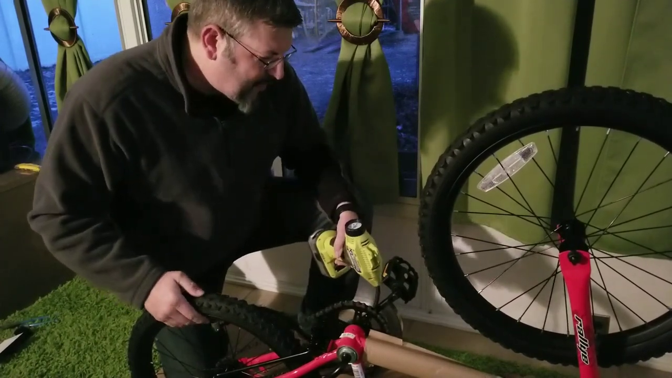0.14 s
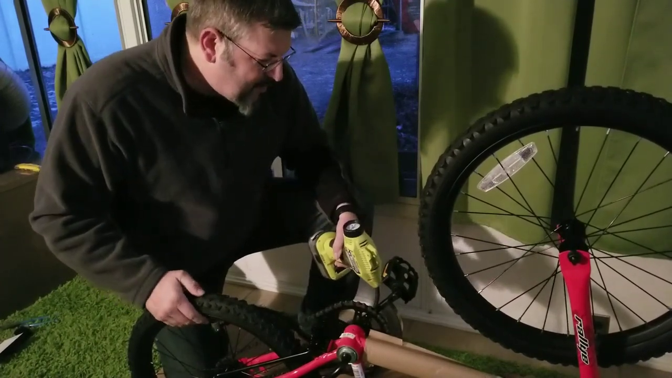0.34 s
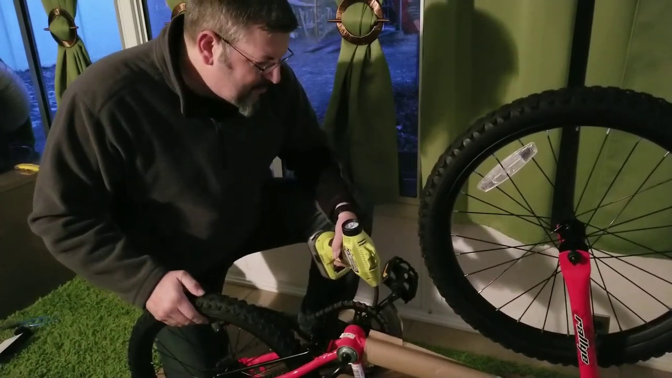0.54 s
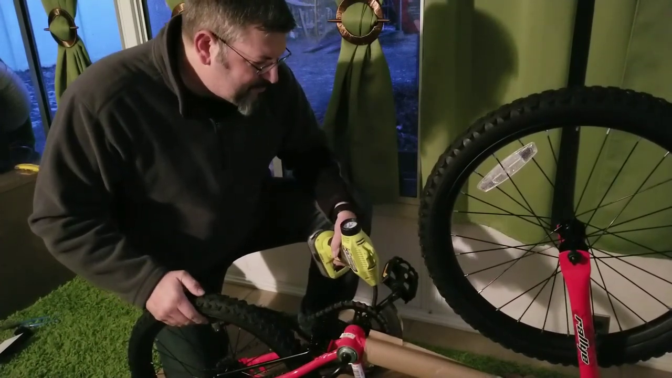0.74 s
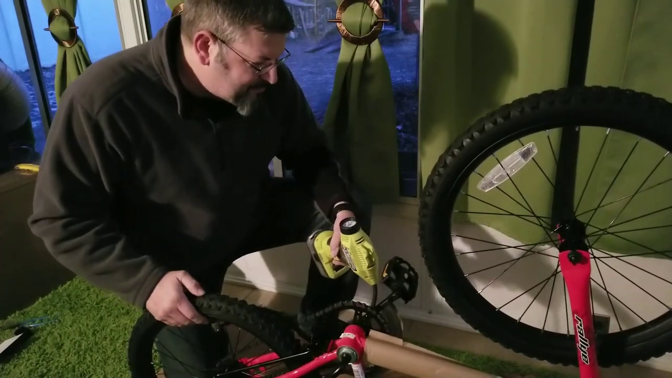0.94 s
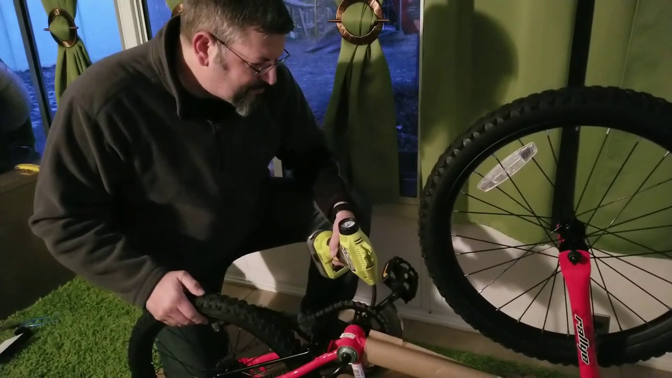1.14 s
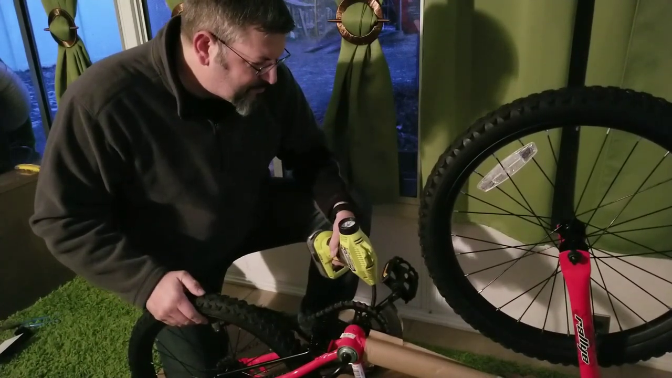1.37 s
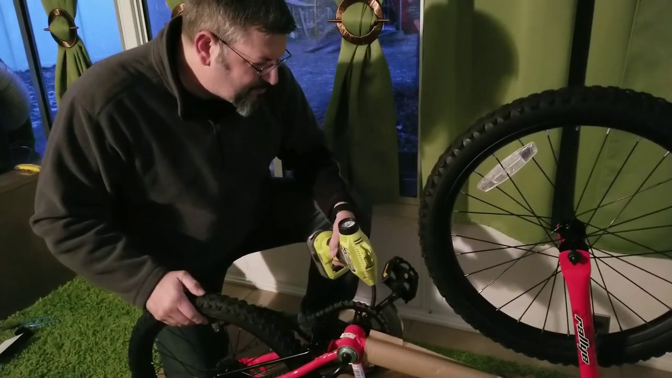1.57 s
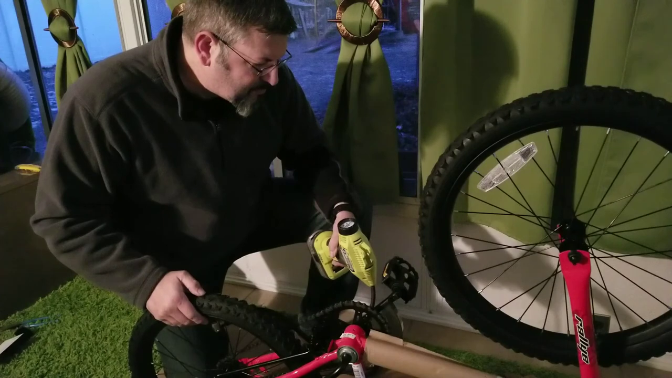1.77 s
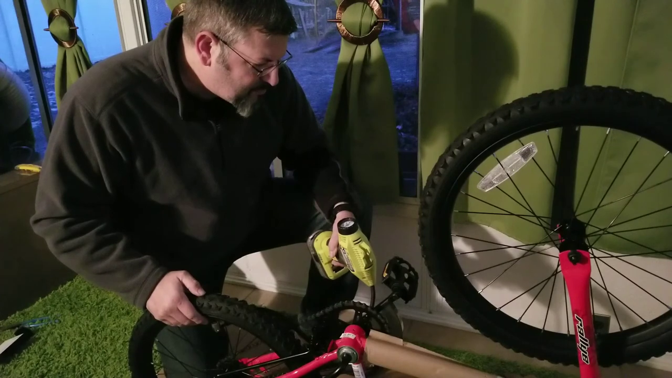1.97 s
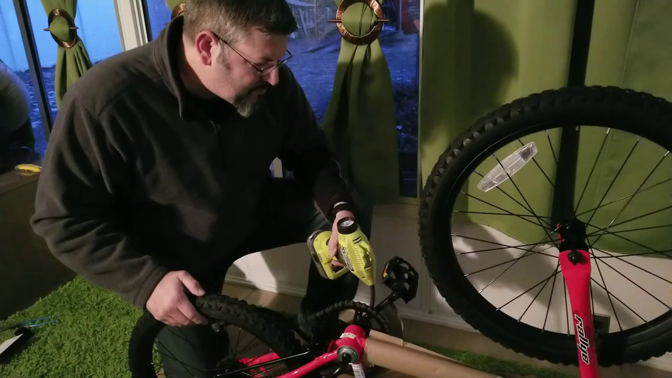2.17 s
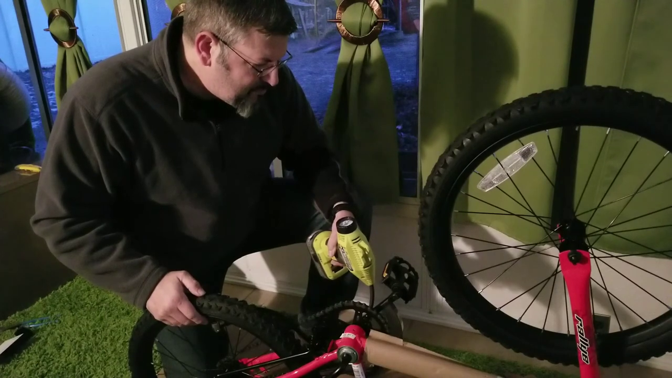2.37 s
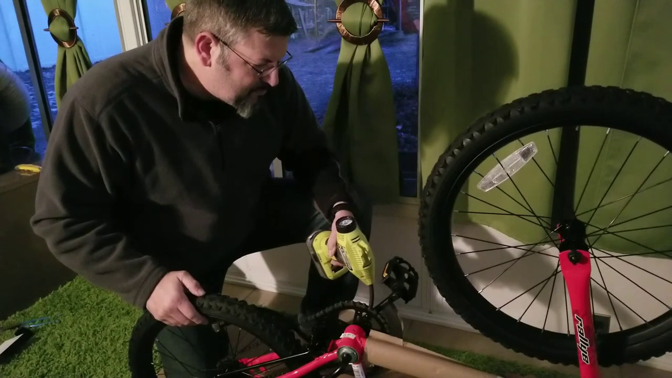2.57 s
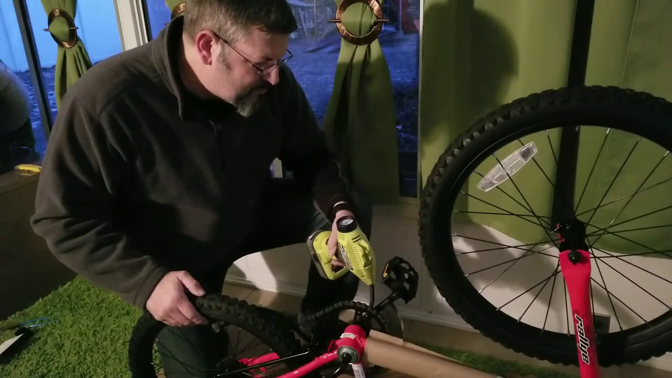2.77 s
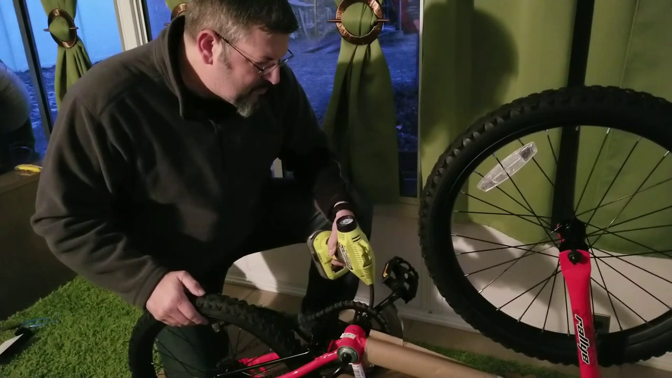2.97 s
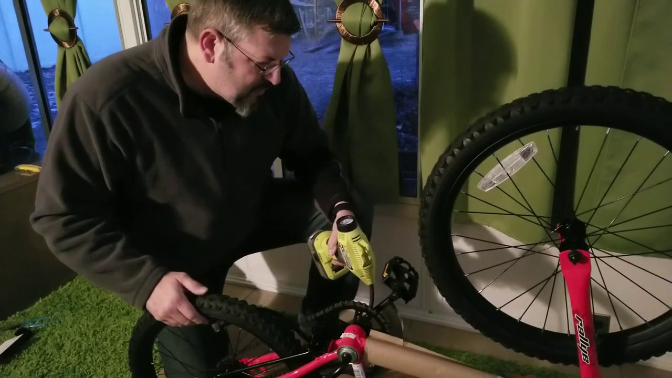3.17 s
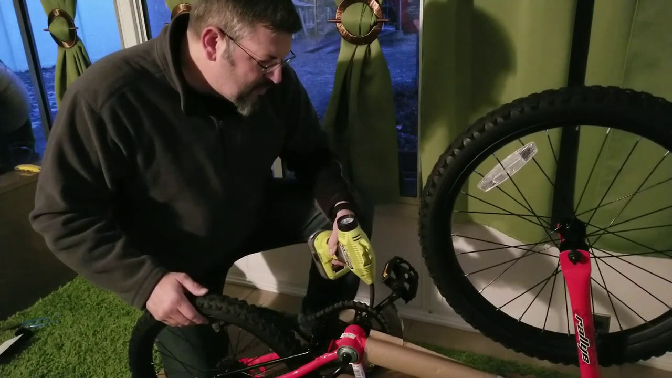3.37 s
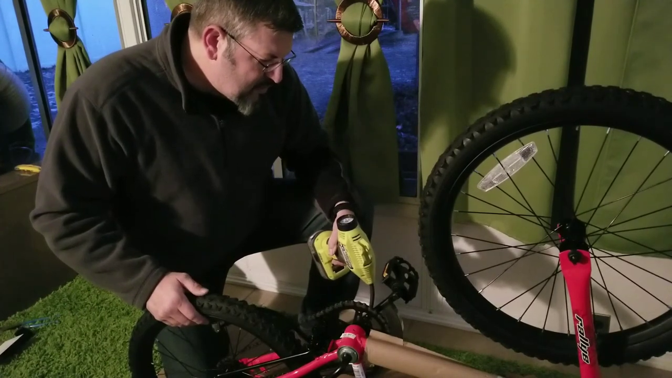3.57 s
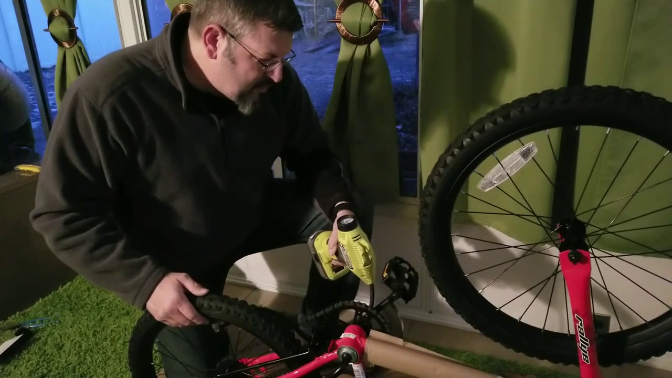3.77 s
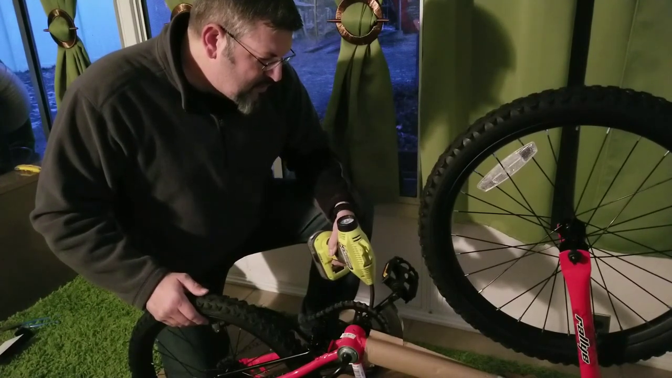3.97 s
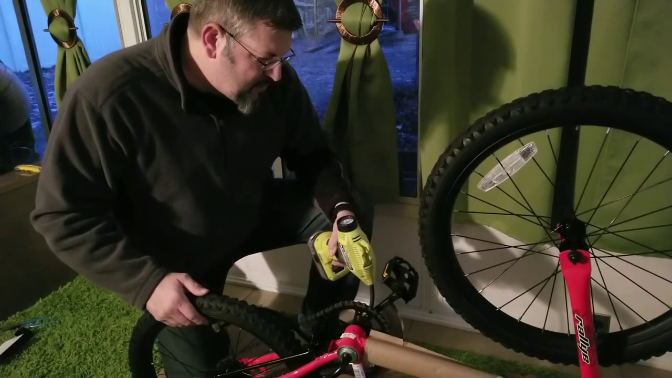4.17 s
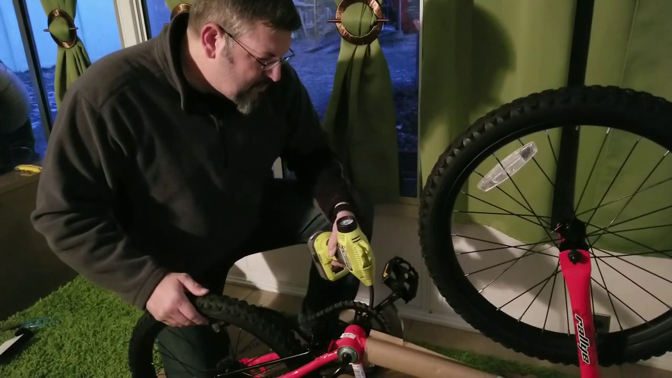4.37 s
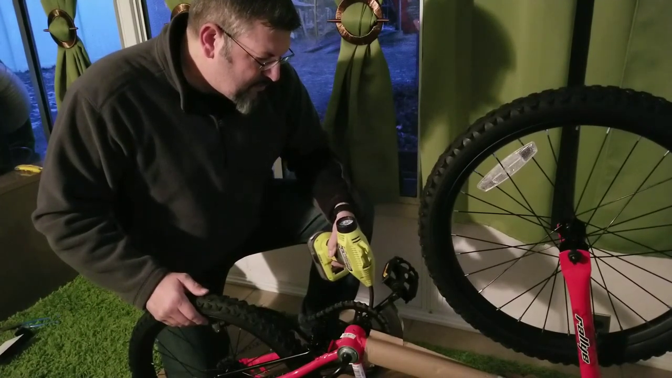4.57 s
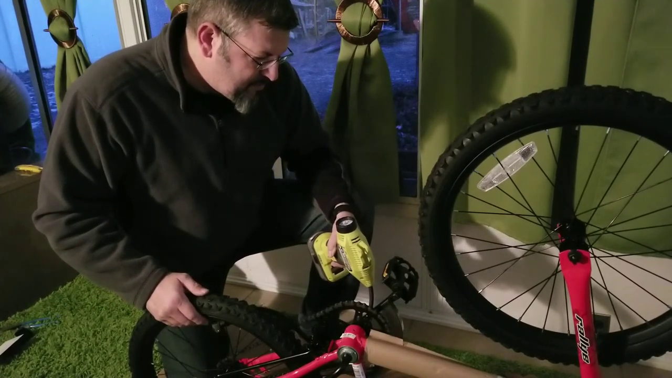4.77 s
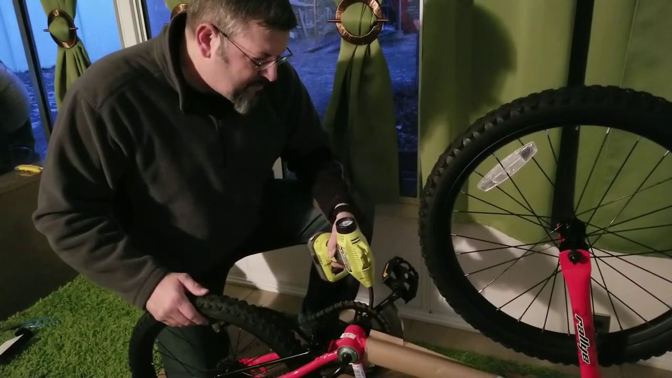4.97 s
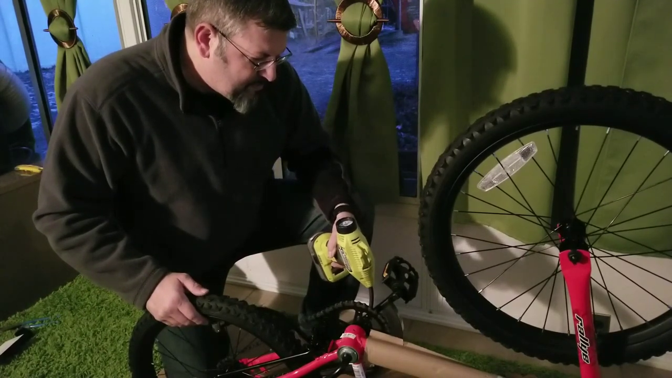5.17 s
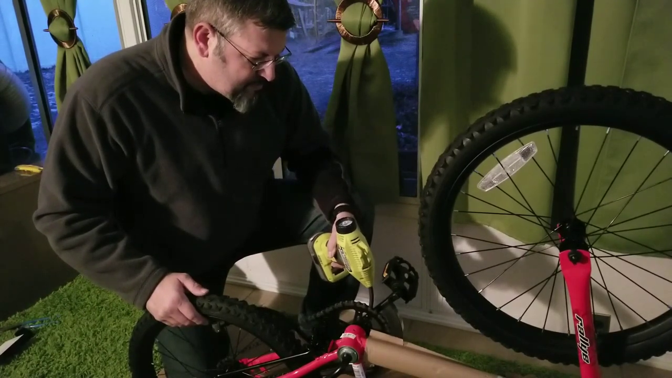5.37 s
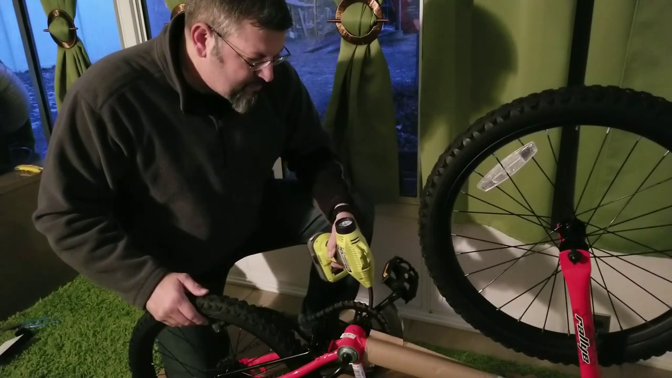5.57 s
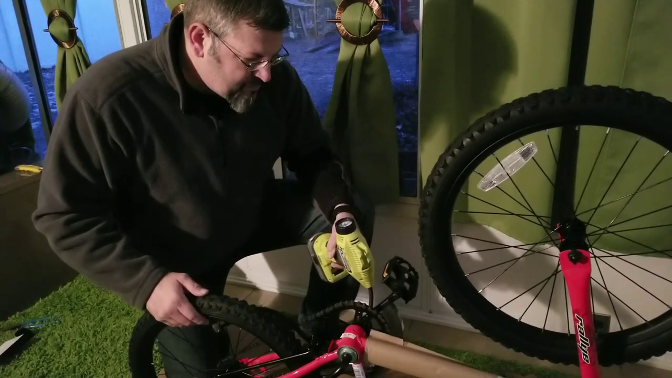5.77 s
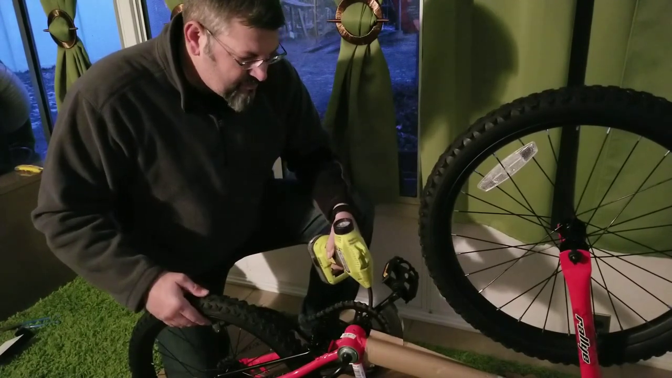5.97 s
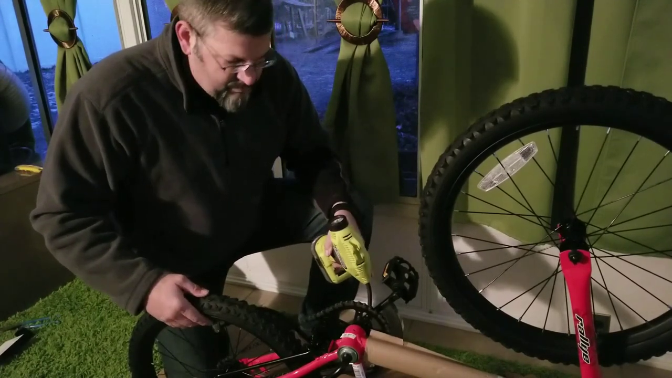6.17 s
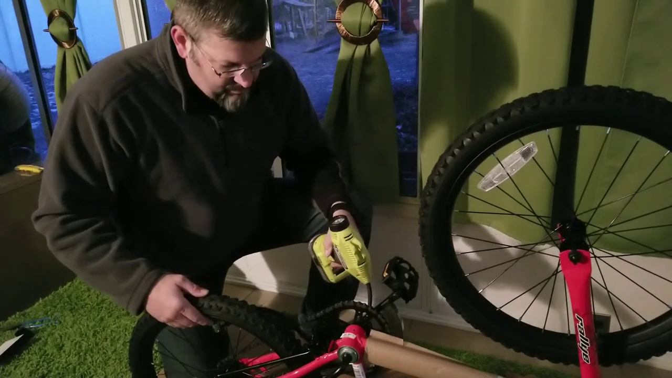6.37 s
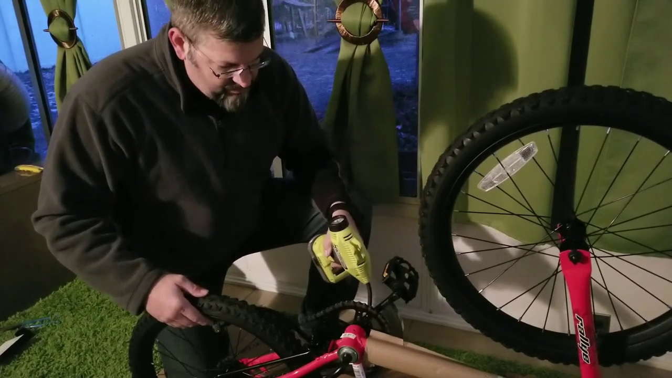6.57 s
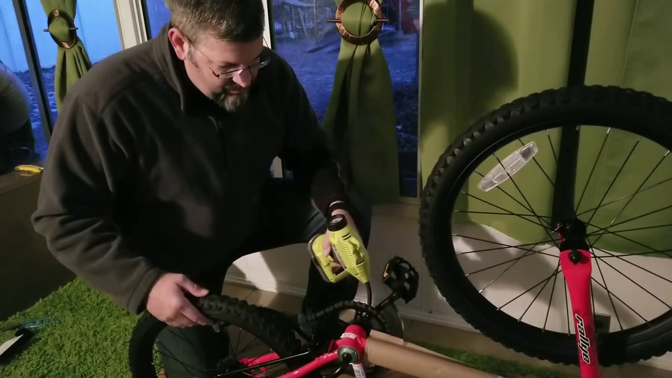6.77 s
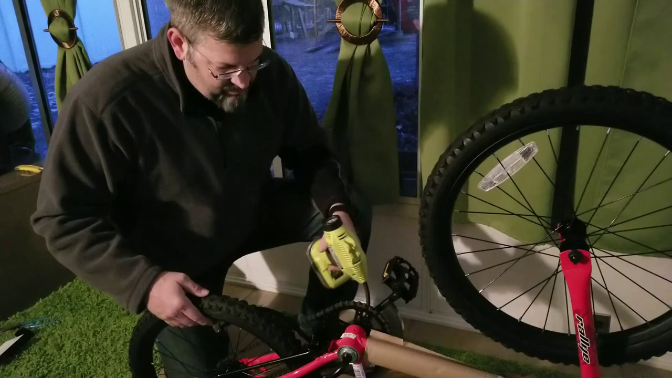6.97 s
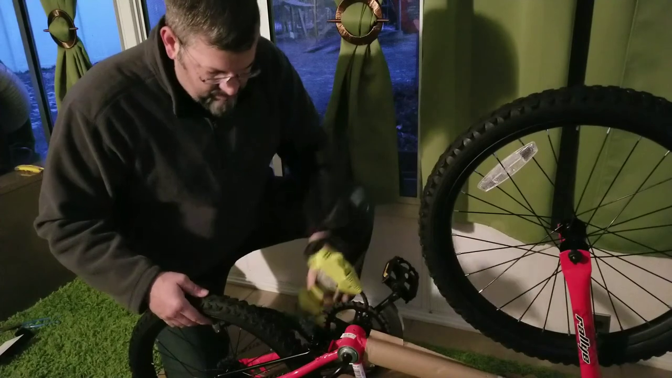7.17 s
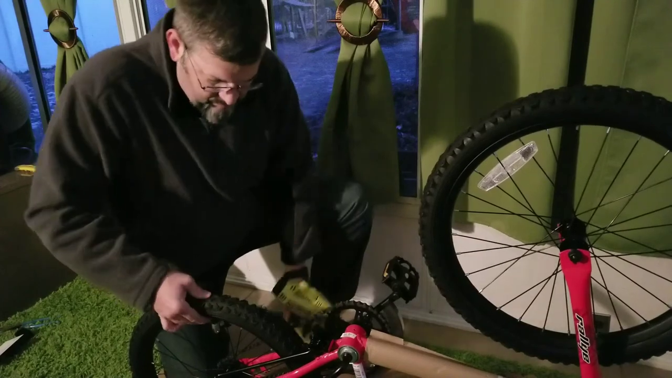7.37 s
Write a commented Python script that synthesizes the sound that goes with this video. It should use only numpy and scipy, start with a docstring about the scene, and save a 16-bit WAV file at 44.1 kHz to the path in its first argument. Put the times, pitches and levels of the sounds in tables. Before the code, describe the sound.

A handheld electric pump is already running at full strength, filling a bicycle tire: dense gear rattle, fast piston buzz, nasal whine and airy hiss. It slows very slightly, then after six seconds stops abruptly with short squeals, a dulling clatter and a tiny double tick. Quiet room tone and a few soft handling bumps follow. Close stereo microphone in a small, well-damped room.

```python
"""A small air pump is already rattling and whining as it fills a bicycle tire in a small, well-damped room.
A motor drives its piston through gears: teeth rattle, the rod knocks and chatters, the valves hiss and snap.
All these follow one crank angle; pitched lines from stroke and gears are added on top.
The crank slows a little as pressure builds, then the motor cuts off with short squeals and the crank coasts.
Quiet room tone and a few soft handling bumps remain."""
import sys
import numpy as np
from scipy import signal
from scipy.fft import rfft, irfft, next_fast_len
from scipy.io import wavfile

SR = 44100
rng = np.random.default_rng(int(sys.argv[2]) if len(sys.argv) > 2 else 0)


def generate_wav(sig):
    """Save sig (samples, or channels by samples) to the path in sys.argv[1] as 16-bit PCM at SR."""
    pcm = np.round(np.clip(np.atleast_2d(sig).T, -1, 1) * 32767).astype(np.int16)
    wavfile.write(sys.argv[1], SR, pcm)


N = 327341
TIME = np.arange(N) / SR   # seconds
SIZE = 2 * next_fast_len(N // 2 + SR // 4)   # transform length, with spare room for filter tails
HZ = np.maximum(np.arange(SIZE // 2 + 1) * SR / SIZE, 1)

# All levels are relative: later stages add the case, the room or the left-right balance.
# In every swell, length_s is the time from the peak to where the gain is down to about a seventh.

# loudness of the running pump: time_s, level_db
PUMP_LEVEL = [(0.06, -21), (1.38, -19.5), (1.46, -19.5), (3.67, -20), (3.92, -20.5), (5.02, -21.5),
              (6.14, -20.5)]
# force left in the rattle as the crank coasts: time_s, level_db
COASTING_LEVEL = [(6.19, 0), (6.24, 1), (6.272, -2.5), (6.305, -1), (6.328, -8), (6.345, -6), (6.362, -2),
                  (6.38, -12.5), (6.405, -19.5), (6.45, -32), (6.52, -70)]
# the pressure's time constant (s); crank speed with no pressure, and its loss at the pump's limit (turns per s)
FILL_S, FREE_TURNS_PER_S, SAG_TURNS_PER_S = 10.0, 62.22, 4.75
# the tone moves from soft to full tire between these pressures (share of the pump's limit)
SOFT_PRESSURE, FIRM_PRESSURE = 0.11, 0.28
# the motor cuts off, and the crank takes this long to stop (s)
CUT_S, COAST_S = 6.171, 0.27
# pace of the lines' fade and of the rumble's return after the cut-off (s)
LINES_FADE_S, RUMBLE_RETURN_S = 0.035, 0.15

# teeth on the two gears; lower edge of their rattle (Hz)
PINION_TEETH, WHEEL_TEETH, TEETH_LOW_HZ = 10, 66, 700
# piston knocks within each turn: position_turns, level_db
KNOCK_POINTS = [(0.2, -4), (0.452, 0), (0.529, -19.5), (0.731, 4.5)]
# knocks against the teeth, chatter against all contacts, trims of the rattle and of the pitched lines (dB)
KNOCK_DB, CHATTER_DB, RATTLE_DB, LINES_DB = -12.5, -10.5, 0.5, -0.12

# broad colour of the plastic case: pitch_hz, level_db
CASE_COLOUR = [(120, -46.5), (220, -39), (300, -1.5), (600, -7), (1300, -4), (2100, -6), (2600, -2.5),
               (3000, -2), (3900, 1.5), (5400, -2), (7000, 0.5), (7800, -5), (11000, 1), (14500, -2)]
# resonances and hollows of case and air path: pitch_hz, width_hz, soft_tire_db, full_tire_db
CASE_RESONANCES = [(397, 63, -10, 0.5), (718, 510, -1, -0.5), (945, 82, 1.5, 1), (1240, 120, 1, 3.5),
                   (1825, 390, 1.5, 2.5), (2011, 26, 6.5, 5.5), (2484, 120, 1.5, 5), (2730, 410, 2.5, 1),
                   (3510, 910, 0.5, 2.5), (4165, 190, 4.5, 0.5), (4660, 260, 2.5, 3.5), (4970, 130, 0.5, 2),
                   (5520, 180, 0, 1.5), (6014, 80, 3, 8), (7210, 340, 1.5, 2.5), (8410, 540, 5, 4.5),
                   (9760, 2500, -4, -4)]
# side sound against middle sound, as the two microphone ports hear it: pitch_hz, level_db
STEREO_WIDTH = [(200, -19.5), (380, -13.5), (700, -2), (1300, -1.5), (2400, -6), (4400, -4.5), (7000, 2.5),
                (9000, -0.5), (14000, -3)]
# power share of the side sound that comes by way of the walls: pitch_hz, share (0 to 1)
WALL_SHARE = [(700, .03), (2000, .25), (4000, .35), (8000, .6)]
# resonances that swell or sink as the hand shifts and parts settle: start_s, end_s, pitch_hz, width_hz, level_db
RESONANCE_SPELLS = [(-.3, 1.56, 410, 110, -10), (-.3, 0.26, 8900, 405, 6), (-.3, 0.56, 4200, 199, -0.5),
                    (-.3, 1.58, 5670, 130, 7), (.55, 1.15, 2850, 129.5, 1), (.65, 1.3, 2530, 98, 3.5),
                    (.8, 1.9, 8570, 128.2, 5.5), (.8, 2.6, 8820, 90, 4.5), (1.0, 2, 6300, 60.5, 1.5),
                    (1.3, 2.5, 4020, 200, 1), (1.7, 3.2, 910, 70.5, 1.5), (2.7, 4.4, 5740, 89.7, 3.5),
                    (3.1, 5.8, 3750, 70, 1.5), (3.8, 6.2, 9400, 703, -2), (4.1, 5.4, 1830, 604, -2.5),
                    (4.3, 7.9, 4940, 70, 4), (4.5, 6.2, 5580, 39.7, 8.5), (4.0, 5.6, 2380, 91.2, 0.5)]
SPELL_EDGE_S = 0.07   # each change is spread this far to either side of its time

# harmonics of the piston stroke: multiple_of_crank_speed, soft_tire_db, full_tire_db
STROKE_HARMONICS = [(5, -53, -45.5), (6, -55, -47), (7, -71, -60), (8, -46, -45), (9, -45, -51),
                    (10, -59, -63), (11, -46, -43), (12, -43, -51), (13, -44, -47.5), (14, -50, -50),
                    (15, -37, -44.5), (16, -47, -49), (17, -43, -53), (18, -54, -50), (19, -56, -55),
                    (20, -51, -39), (21, -52, -44.5), (22, -46, -46), (23, -56, -56), (24, -51, -44.5),
                    (25, -45, -49), (26, -53, -53)]
# gear lines that each swell once: multiple_of_crank_speed, peak_s, length_s, level_db
GEAR_LINES = [(40, 1.9, 2.2, -45), (41, 5.3, 6, -41.5), (42, 5.3, 2.5, -45), (43, 2.6, 1.8, -43),
              (44, .7, 4, -39.5), (45, 5.4, 1.5, -42.5), (46, .8, 1.3, -45), (47, .4, 1.1, -41.5),
              (48, 3.3, 1.8, -45.5), (55, .8, 1.2, -42.5), (56, 5.2, 1.8, -43.5), (59, 3.5, 1.6, -43),
              (61, 3.7, 1.2, -38), (63, 2, .9, -36), (64, 3.5, 6, -41), (65, 3, 3, -43.5),
              (67, 1.2, 5, -40), (68, .8, 1.6, -41.5), (69, .6, .9, -41.5), (76.8, 2, 1, -42.5),
              (82, 5.2, 1.2, -41.5), (82.4, 5, 1, -42.5), (85, 5.3, 1.3, -44.5), (91, .6, 1.5, -43.5),
              (92, 1.1, .9, -38.5), (94, 4.6, 1.8, -42.5), (99, 2.8, 1.2, -42.5), (99.8, 3.3, .9, -41),
              (136, 1.2, 1.3, -44.5)]
# brief patches where the bass edge comes through, at the third crank harmonic: peak_s, length_s, level_db
BASS_PATCHES = [(.05, 0.11, -52.5), (.15, 0.011, -46), (.325, 0.11, -56), (.555, 0.014, -46),
                (.7, 0.04, -58), (.855, 0.043, -48.5), (2.24, 0.016, -50)]
PATCH_PAN_DB = 14   # left against right
# bass edge at the fourth crank harmonic: level when fully on (dB), pace of its flicker (Hz)
FLICKER_DB, FLICKER_RATE = -52.5, 11
# how high chance must rise to let it through, early and later on (standard deviations)
FLICKER_BAR_EARLY, FLICKER_BAR_LATE = 0.1, 2.9

# colour of the room tone: pitch_hz, level_db
ROOM_TONE_COLOUR = [(30, -29), (130, -34.5), (210, -12.5), (335, 0), (450, -3.5), (650, -19.5), (2250, -25),
                    (2500, -17.5), (3100, -20.5), (4050, -22), (4600, -13.5), (7400, -13.5), (8000, -28),
                    (14500, -28)]
# colour of the low rumble: pitch_hz, level_db
RUMBLE_COLOUR = [(20, -6), (45, -10), (75, -10), (130, 0.5), (190, -16.5), (300, -35), (1000, -63)]
# soft handling bumps: peak_s, length_s, level_db
HANDLING_BUMPS = [(6.615, 0.088, -65.5), (6.98, 0.062, -65), (7.16, 0.068, -62)]
# colour of the bumps: pitch_hz, level_db
HANDLING_COLOUR = [(100, -29), (230, -16), (330, 9), (480, -12), (900, -33), (4000, -50)]
# steady background, and how much lower the rumble sits while the motor drives (dB)
ROOM_TONE_DB, RUMBLE_DB, RUMBLE_DIP_DB = -66.5, -77, 15
# the pump is swung away at the end: peak (s), length (s), rumble (dB), rustle (dB)
SWING_S, SWING_LENGTH_S, SWING_RUMBLE_DB, SWING_RUSTLE_DB = 7.36, 0.12, -77.5, -77.5

# squeals as the motor cuts off: peak_s, length_s, level_db
CUTOFF_SQUEALS = [(6.186, 0.0092, -27.5), (6.202, 0.009, -18), (6.228, 0.009, -26.5), (6.253, 0.014, -20.5)]
# colour of the squeals: pitch_hz, level_db
SQUEAL_TONE = [(200, -80), (2500, -49.5), (4100, -11), (4600, 6), (4900, -17.5), (5600, -16), (9000, -36.5)]
# the pump chamber rings as the crank coasts: peak (s), length (s), level (dB), pitch (Hz)
RING_S, RING_LENGTH_S, RING_DB, CHAMBER_HZ = 6.355, 0.02, -37.5, 1220
# double tick as the gears fall back into their play: time_s, level_db
GEAR_TICKS = [(6.412, -18.5), (6.418, -23.5)]
# colour of the ticks: pitch_hz, level_db
TICK_TONE = [(200, -10.5), (900, -2), (1500, 2), (1950, -4), (2500, 7.5), (3500, 0.5), (4200, -9),
             (10000, -13.5), (13000, -7.5)]
CUTOFF_HZ = 14600   # upper edge of the whole sound


def from_db(db):
    """Turn decibels into gain."""
    return np.exp(np.asarray(db) * (np.log(10) / 20))


def rms_one(x):
    """Scale a signal to unit power."""
    return x / np.sqrt(np.mean(x ** 2) + 1e-20)


def level_over_time(rows):
    """Join a table's levels with straight lines in time."""
    seconds, db = np.transpose(rows)
    return np.interp(TIME, seconds, db)


def spectrum(points):
    """Find the dB at every frequency, joining points on a log axis."""
    hz, db = np.transpose(points)
    return np.interp(np.log(HZ), np.log(hz), db)


def colour(x, db):
    """Filter to a dB curve with no sound ahead of its cause (minimum phase)."""
    cepstrum = irfft(np.log(from_db(db)))
    cepstrum[1:SIZE // 2] *= 2
    cepstrum[SIZE // 2 + 1:] = 0
    response = np.exp(rfft(cepstrum))
    return irfft(rfft(x, SIZE) * response)[..., :N]


def filtered(x, order, hz, kind):
    """Keep only the high part or a band of a sound."""
    return signal.sosfilt(signal.butter(order, hz, kind, fs=SR, output="sos"), x)


def resonance(x, hz, width):
    """Pick out the part of a sound that rings near one pitch."""
    return signal.lfilter(*signal.iirpeak(hz, hz / width, fs=SR), x)


def drift(rate):
    """Smooth random wandering with unit power; rate is in Hz."""
    r = np.exp(-200 * np.pi * rate / SR)   # one step every 100 samples
    noise = rng.standard_normal(N // 100 + 1002)
    slow = signal.lfilter([1], [1, -2 * r, r * r], noise)[1000:]
    return np.interp(np.arange(N) / 100, np.arange(len(slow)), rms_one(slow))


def clicks(seconds, sizes):
    """Place impacts one sample long."""
    at = np.round(np.asarray(seconds) * SR).astype(int)
    return np.bincount(np.clip(at, 0, N), sizes, N + 1)[:N]


def swells(rows):
    """Add bell-shaped envelopes from peak_s, length_s, level_db rows."""
    return sum(from_db(db) * np.exp(-2 * ((TIME - s) / length) ** 2) for s, length, db in rows)


def scatter(x, t60):
    """Spread a sound into dense echoes that fall 60 dB in t60 seconds."""
    t = TIME[:SR // 2]
    echoes = rng.standard_normal(len(t)) * from_db(-60 * t / t60)
    return signal.fftconvolve(x, echoes / np.linalg.norm(echoes))[:N]


def load(turns, opens_at, lasts):
    """Rise suddenly once a turn, then decay."""
    return np.exp(-((turns - opens_at) % 1) / lasts)


def fade(seconds):
    """Stay at 1 while the motor drives, then fall like half a bell."""
    return np.exp(-(np.maximum(TIME - CUT_S, 0) / seconds) ** 2)


def crank_speed(pressure, easing=1.4):
    """Back pressure slows the crank; after the cut-off friction brings it to rest (turns per s)."""
    coasting = 1 - np.clip((TIME - CUT_S) / COAST_S, 0, 1) ** easing
    return (FREE_TURNS_PER_S - SAG_TURNS_PER_S * pressure) * coasting


def gear_rattle(turns, tooth_db=3.6, chance_db=2.0, turn_db=.4, play=.3, slip=.015,
                wobble=.15, surge=.07, worn_share=.2, thrust=.1):
    """The same teeth meet every five turns, so uneven clatter repeats; worn teeth repeat every turn."""
    pairs = np.lcm(PINION_TEETH, WHEEL_TEETH)
    error, offset, flank = rng.standard_normal((3, pairs))
    tooth = np.arange(pairs * 80)
    strength, late, turn_strength = rng.standard_normal((3, len(tooth)))
    turn, on_wheel = np.divmod(tooth, WHEEL_TEETH)
    worn = rng.random(WHEEL_TEETH) < worn_share
    pair = np.where(worn[on_wheel], on_wheel, tooth % pairs)

    meets_at = (tooth + play * offset[pair] + slip * late) / WHEEL_TEETH
    when = np.interp(meets_at, turns, TIME, right=N)
    hit_db = tooth_db * np.clip(error[pair], -2, 2) + chance_db * strength + turn_db * turn_strength[turn]
    sizes = from_db(hit_db) * np.sign(flank[pair])
    # the pinion presses harder once a motor turn
    eccentric = 1 + wobble * np.cos(2 * np.pi * tooth / PINION_TEETH)
    cycle = 2 * np.pi * tooth / pairs
    # some stretches of the cycle mesh tighter
    tight = 1 + surge * (np.cos(cycle) + np.sin(2 * cycle))
    # the piston pushes back at the top of its stroke
    pushing = 1 + thrust * load(tooth / WHEEL_TEETH, opens_at=0.63, lasts=0.22)
    clatter = rms_one(clicks(when, sizes * eccentric * tight * pushing))
    return filtered(clatter, 2, TEETH_LOW_HZ, "high")


def piston_knocks(turns, chance_db=1.2, looseness=.004, dull_hz=3800, ring_t60=.008):
    """Rod and bearings take up their play at fixed points of each turn, each with its own short ring."""
    turn = np.arange(400)
    out = 0
    for part, db in KNOCK_POINTS:
        strength, late = rng.standard_normal((2, len(turn)))
        when = np.interp(turn + part + looseness * late, turns, TIME, right=N)
        hits = clicks(when, from_db(db + chance_db * strength))
        out = out + hits + 0.43 * scatter(hits, ring_t60)
    return rms_one(filtered(out, 3, [1750, dull_hz], "band"))


def valve_snaps(turns, chance_db=5.0, looseness=0.0065):
    """The outlet valve snaps open once a turn with a bright tick."""
    turn = np.arange(400)
    strength, late = rng.standard_normal((2, len(turn)))
    when = np.interp(turn + .49 + looseness * late, turns, TIME, right=N)
    ticks = clicks(when, from_db(chance_db * np.clip(strength, -2, 1)))
    return rms_one(filtered(ticks, 2, 3000, "high"))


def rod_chatter(turns, chance_db=1.8, looseness=.04, attack_s=.0007, decay_s=.0022):
    """The loose rod end makes short noise bursts at each reversal, harder at the top of the stroke."""
    stroke = np.arange(800)   # two reversals a turn
    strength, late = rng.standard_normal((2, len(stroke)))
    when = np.interp(stroke / 2 + 0.445 + looseness * late, turns, TIME, right=N)
    hit_db = chance_db * np.clip(strength, -3, 1) - 4 * (stroke % 2)
    hits = clicks(when, from_db(hit_db))
    poles = np.exp(-1 / (SR * np.array([attack_s, decay_s])))
    burst = signal.lfilter([1], np.poly(poles), hits + 1e-18)
    return rms_one(filtered(burst * rng.standard_normal(N), 2, [2700, 5600], "band"))


def valve_air(turns, puff=.7, intake=.58):
    """Air hiss spurts as the outlet valve opens, less as the inlet does, from vents on both sides."""
    outlet = puff * load(turns, opens_at=0.34, lasts=0.16)
    inlet = intake * load(turns, opens_at=0.76, lasts=0.092)
    vents = rng.standard_normal((2, N)) + 0.87 * rng.standard_normal(N)
    hiss_colour = spectrum([(300, 3.5), (1500, 7.0), (4000, 2), (7000, 7.0), (11000, 3.5)])
    return rms_one(colour(vents * (1 + outlet + inlet), hiss_colour))


def soften(force, speed, dull_hz=1800, steepness=1.3):
    """Contacts turn dull as the crank loses its speed."""
    bright = np.minimum(speed / np.interp(CUT_S, TIME, speed), 1) ** steepness
    dull = signal.lfilter(*signal.butter(1, dull_hz, fs=SR), force)
    return bright * force + (1 - bright) * dull


def case(force, firmness, flutter_db=.7, flutter_rate=22):
    """The case rings; its resonances change in level with back pressure and flutter as parts shake."""
    broad = spectrum(CASE_COLOUR)
    out = colour(force, broad) / np.sqrt(np.mean(from_db(broad) ** 2))
    for hz, width, soft_db, full_db in CASE_RESONANCES:
        ring = resonance(out, hz, width)
        gain = from_db(soft_db + firmness * (full_db - soft_db) + flutter_db * drift(flutter_rate))
        out = out + (gain - 1) * ring
    return from_db(-2.5) * out


def room(x, wet_db=-5, t60=0.048, wall_s=.004, port_ripple_hz=260, lead=0.88):
    """Two ports hear pitches out of step, treble partly off walls; curtains and carpet keep the tail short."""
    mid = x.mean(axis=0)
    chance = np.interp(HZ / port_ripple_hz, np.arange(400), rng.standard_normal(400))
    step = np.tanh(3 * (chance + lead * (HZ < 6000)))
    share = spectrum(WALL_SHARE)
    direct = 1j * step * rfft(mid, SIZE)   # a quarter cycle out of step
    diffuse = rfft(scatter(mid, .13), SIZE)
    blend = np.sqrt(1 - share) * direct + np.sqrt(share) * diffuse
    side = irfft(from_db(spectrum(STEREO_WIDTH)) * blend)[:N]
    late = np.interp(TIME - wall_s, TIME, mid, left=0)
    tail = np.array([scatter(late, t60), scatter(late, t60)])
    return x + side * np.array([[1], [-1]]) + from_db(wet_db) * tail


def spells(x):
    """Lift or lower each resonance while its spell lasts."""
    for start, end, hz, width, db in RESONANCE_SPELLS:
        corners = [start - SPELL_EDGE_S, start + SPELL_EDGE_S, end - SPELL_EDGE_S, end + SPELL_EDGE_S]
        on = np.interp(TIME, corners, [0, 1, 1, 0])
        x = x + (from_db(db) - 1) * on * resonance(x, hz, width)
    return x


def crank_line(order, turns, db, spread_hz, port_hz=2400):
    """A tone locked to the crank: low ones lag in the case, high ones reach the two sides out of step."""
    lag, across = rng.standard_normal(2)
    hz = order * FREE_TURNS_PER_S
    cycles = order * (turns - .45) % 1
    phase = (2 * np.pi * cycles + lag * (spread_hz / hz) ** 2).astype(np.float32)
    side = np.sign(across) * min(hz / port_hz, .8) * np.sin(phase)
    return np.sqrt(2) * from_db(db) * (np.cos(phase) + np.array([side, -side]))


def drone(turns, firmness, waver_db=.7, rough_db_per_order=.06):
    """Repeating piston strokes make a row of harmonics; the higher ones waver more in level."""
    out = 0
    for order, soft_db, full_db in STROKE_HARMONICS:
        waver = max(waver_db, rough_db_per_order * order) * drift(16)
        db = soft_db + firmness * (full_db - soft_db) + waver
        out = out + crank_line(order, turns, db, spread_hz=1050)
    return out


def whine(turns, waver_db=2.2, waver_rate=17, throb_db=3.0):
    """Flickering gear tones swell in turn; together they throb twice in each five-turn gear cycle."""
    throb = from_db(throb_db * np.sin(2 * np.pi * turns * 2 / 5))
    out = 0
    for order, peak_s, length_s, db in GEAR_LINES:
        line = crank_line(order, turns, waver_db * drift(waver_rate), spread_hz=9220)
        out = out + swells([(peak_s, length_s, db)]) * line
    return throb * out


def bass_edge(turns, progress, snap=2.6, waver=.6):
    """The bass edge comes through in brief patches (third crank harmonic) and flickers (fourth), rarer later."""
    def harmonic(order):
        """A crank harmonic whose phase wavers."""
        return np.sqrt(2) * np.sin(2 * np.pi * order * turns + waver * drift(10))
    third, fourth = harmonic(3), harmonic(4)
    bar = FLICKER_BAR_EARLY + (FLICKER_BAR_LATE - FLICKER_BAR_EARLY) * progress ** 14
    on = .5 + .5 * np.tanh(snap * (drift(FLICKER_RATE) - bar))
    flicker = from_db(FLICKER_DB) * on * fade(LINES_FADE_S) * fourth
    pan = from_db(PATCH_PAN_DB * np.array([[.5], [-.5]]))
    return flicker + swells(BASS_PATCHES) * third * pan


def background():
    """Coloured noise makes the room tone, rumble and handling sounds, louder on the left."""
    def wide_noise(points):
        """Partly shared stereo noise of a given colour."""
        common, own = rng.standard_normal(N), rng.standard_normal((2, N))
        return rms_one(colour(common + 1.5 * own, spectrum(points))) * from_db([[2.5], [-3]])
    hiss = from_db(ROOM_TONE_DB) + swells([(SWING_S, SWING_LENGTH_S, SWING_RUSTLE_DB)])
    rumble = from_db(RUMBLE_DB - RUMBLE_DIP_DB * fade(RUMBLE_RETURN_S))
    rumble = rumble + swells([(SWING_S, SWING_LENGTH_S, SWING_RUMBLE_DB)])
    bumps = swells(HANDLING_BUMPS) * wide_noise(HANDLING_COLOUR)
    return hiss * wide_noise(ROOM_TONE_COLOUR) + rumble * wide_noise(RUMBLE_COLOUR) + bumps


def run_down():
    """Noise-band squeals at the cut-off, a ringing air chamber, then ticks as the gears fall back."""
    squeal = swells(CUTOFF_SQUEALS) * rms_one(colour(rng.standard_normal(N), spectrum(SQUEAL_TONE)))
    tone = np.sin(2 * np.pi * CHAMBER_HZ * TIME + drift(30))
    ring = swells([(RING_S, RING_LENGTH_S, RING_DB)]) * tone
    when, db = np.transpose(GEAR_TICKS)
    ticks = colour(scatter(clicks(when, from_db(db)), t60=0.085), spectrum(TICK_TONE))
    return squeal + ring + ticks


def scene():
    """Tire pressure sets crank speed and tone; the crank angle drives every part of the pump."""
    pressure = 1 - np.exp(-TIME / FILL_S)
    firmness = np.clip((pressure - SOFT_PRESSURE) / (FIRM_PRESSURE - SOFT_PRESSURE), 0, 1)
    speed = crank_speed(pressure)
    turns = np.cumsum(speed * (1 + .0006 * drift(6))) / SR   # slightly uneven running
    pump_db = level_over_time(PUMP_LEVEL)

    air = valve_air(turns) * np.sqrt(speed / FREE_TURNS_PER_S)   # the air flow dies with the speed
    contacts = from_db(-4.0) * (gear_rattle(turns) + from_db(KNOCK_DB) * piston_knocks(turns))
    contacts = contacts + from_db(-21) * valve_snaps(turns)
    parts = contacts + from_db(CHATTER_DB) * rod_chatter(turns) + from_db(-1.0) * air
    force = from_db(pump_db + RATTLE_DB + level_over_time(COASTING_LEVEL)) * parts
    rattle = spells(room(case(soften(force, speed), firmness) + run_down()))

    # the lines swell with the rattle
    effort = from_db(pump_db - np.median(pump_db) + LINES_DB) * fade(LINES_FADE_S)
    lines = drone(turns, firmness) + from_db(-1.5) * whine(turns)
    # firmness climbs from 0 to 1 over time, so here it only marks early from late
    bass = bass_edge(turns, progress=firmness)
    return rattle + effort * lines + bass + background()


def record(dry):
    """Cut the treble steeply above the upper edge."""
    return signal.sosfilt(signal.ellip(12, .1, 80, CUTOFF_HZ, fs=SR, output="sos"), dry)


dry = scene()
out = record(dry)
generate_wav(out)
```